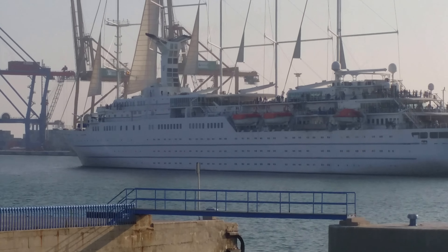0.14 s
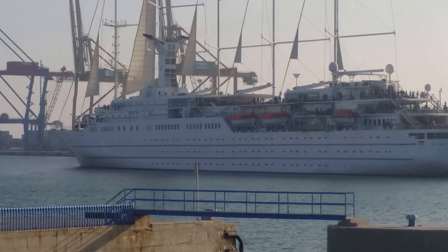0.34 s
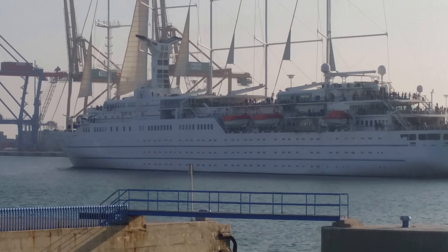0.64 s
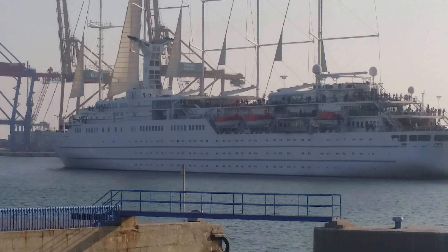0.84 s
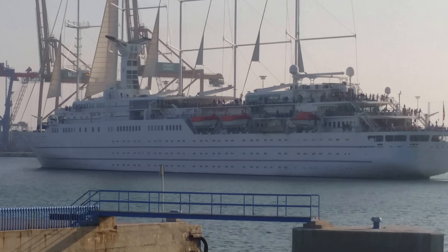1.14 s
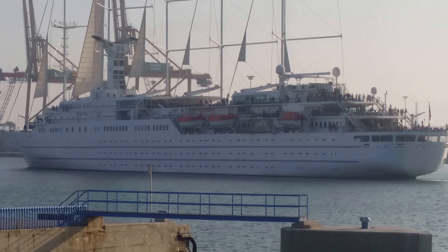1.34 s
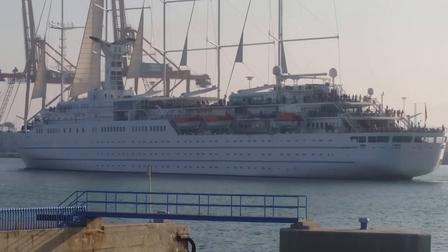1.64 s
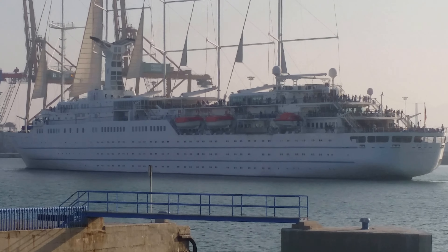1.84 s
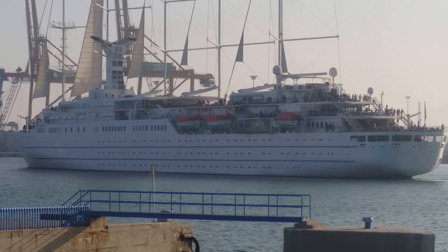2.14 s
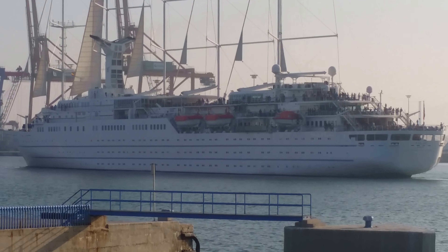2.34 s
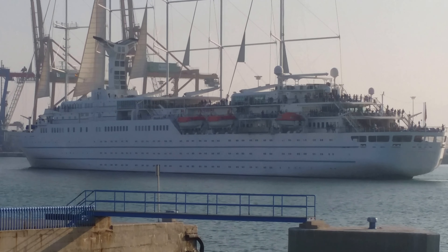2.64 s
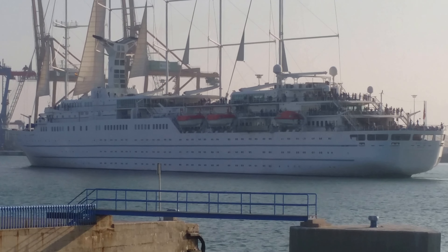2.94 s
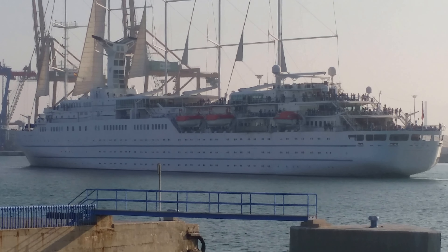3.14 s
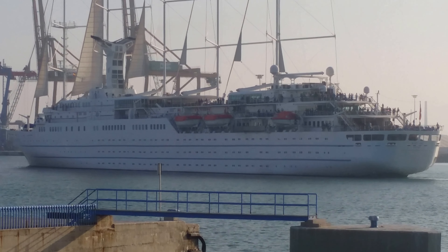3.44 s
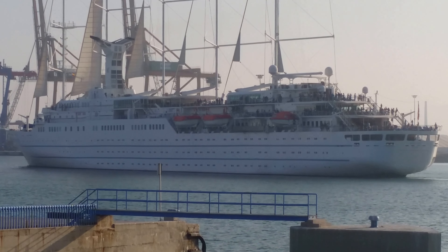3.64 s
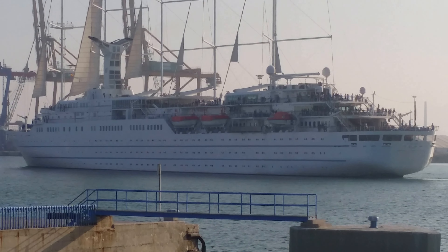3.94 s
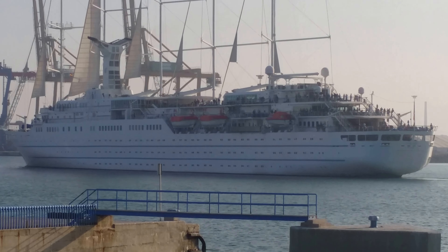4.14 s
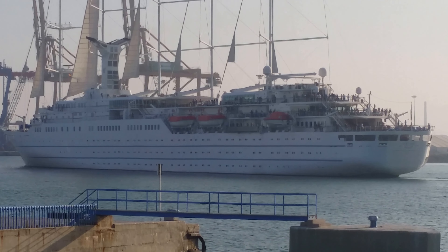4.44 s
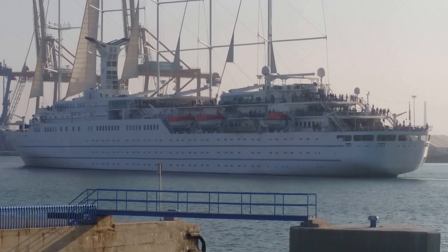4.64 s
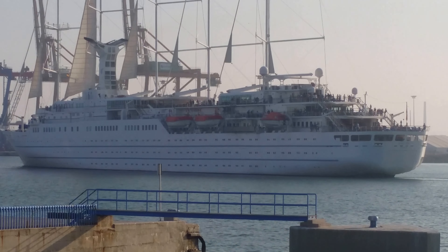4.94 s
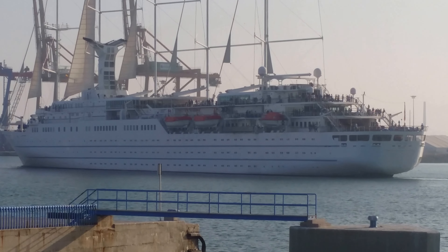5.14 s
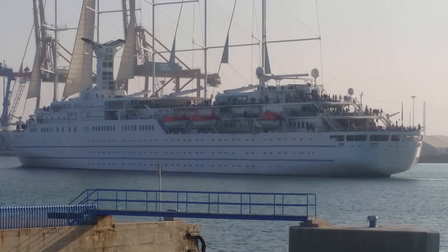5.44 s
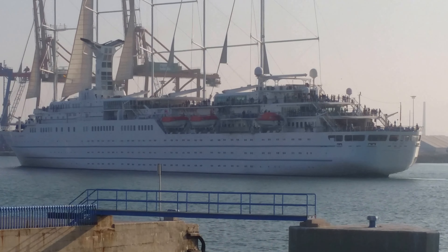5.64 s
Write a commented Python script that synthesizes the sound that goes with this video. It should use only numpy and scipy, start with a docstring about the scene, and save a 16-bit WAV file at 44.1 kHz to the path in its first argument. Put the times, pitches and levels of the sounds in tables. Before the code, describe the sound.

Heard from a quay, a departing ship gives off a deep pulsing rumble and a constant machinery hum over a light wash of water. Wind thumps on the microphone in the first second. About halfway, one sharp button click sounds right at the microphone, and fingers then slide softly on the camera's plastic case. A lens motor whines very faintly now and then while the engines carry on.

```python
"""A gust buffets the microphone over the low throb of a large ship moving slowly away from a quay.
Its diesels pulse under a rumble, its generators and fans hum, and a wash of water recedes with it.
Close by, hands work a camera: a thumb squeaks, halfway a button snaps back and rings the case, then
fingers slide on the plastic. The lens motor whines faintly about once a second."""
import sys
import numpy as np
from scipy import signal
from scipy.fft import rfft, irfft, next_fast_len
from scipy.io import wavfile

SR = 44100
rng = np.random.default_rng(int(sys.argv[2]) if len(sys.argv) > 2 else 0)


def digitize_waveform(pressure):
    """Quantize a signal to 16-bit integers and store it at the path in sys.argv[1].

    Rows of a 2-D input are taken as channels; values are limited to [-1, 1].
    """
    field = np.atleast_2d(pressure).T
    bounded = np.clip(field, -1, 1)
    quanta = np.round(bounded * 32767).astype(np.int16)
    wavfile.write(sys.argv[1], SR, quanta)


N = 255582
TIME, FREQS = np.arange(N) / SR, np.fft.rfftfreq(N, 1 / SR)

# where distant sound sits in the image; lean is left minus right: freq_hz, lean_db
FAR_LEAN = [(60, 0.5), (200, 2.5), (380, 3.5), (1290, 2), (2400, 6.5), (3200, -1.5), (4300, 11), (5500, -1),
            (8000, -0.5), (10000, 8.5), (13000, 1), (16000, 1.5)]


def gain_of(db):
    """Decibels to amplitude."""
    return 10 ** (np.asarray(db) / 20)


def unit_rms(x):
    """Scales to rms 1."""
    return x / np.sqrt(np.mean(x ** 2) + 1e-20)


def curve_at(points, hz=FREQS):
    """Interpolates a curve on a log-frequency axis."""
    f, value = np.transpose(points)
    return np.interp(np.log(hz + 1), np.log(f + 1), value)


def pan(lean_db):
    """Left and right gains of mean power 1."""
    pair = gain_of(np.array([[.5], [-.5]]) * lean_db)
    return pair / np.sqrt(np.mean(pair ** 2, axis=0))


def drift(rate_hz):
    """A smooth random wander of rms 1."""
    size = next_fast_len(N, real=True)
    smooth = np.exp(-np.minimum(np.fft.rfftfreq(size, 1 / SR) / rate_hz, 10) ** 2)
    return unit_rms(irfft(rfft(rng.standard_normal(size)) * smooth, size)[:N])


def swell(start_s, length_s, soft):
    """An envelope whose rounded fades each take the share `soft` of its length."""
    edge = np.minimum(TIME - start_s, start_s + length_s - TIME) / (soft * length_s)
    return np.sin(np.pi / 2 * np.clip(edge, 0, 1))


def ease_in(depth_db, settling_s):
    """A gain that starts low and eases up to 1."""
    return gain_of(-depth_db * np.exp(-TIME / settling_s))


def near_noise(spectrum):
    """Coloured noise, unrelated in the two microphone ports."""
    return unit_rms(irfft(rfft(rng.standard_normal((2, N))) * gain_of(curve_at(spectrum)), N))


def far_noise(spectrum):
    """Coloured noise from afar: narrow in the bass, wide in the treble."""
    # likeness of left and right: freq_hz, correlation
    likeness = [(60, 0.87), (130, 0.95), (290, 0.9), (640, 0.42), (1300, -0.25), (3100, 0.23),
                (15000, -0.63)]
    left, other = rfft(rng.standard_normal((2, N)))
    same = np.clip(curve_at(likeness), -1, 1)
    pair = np.array([left, same * left + np.sqrt(1 - same ** 2) * other])
    rolloff = 1 / (1 + (FREQS / spectrum[-1][0]) ** 8)
    return unit_rms(irfft(pair * gain_of(curve_at(spectrum)) * pan(curve_at(FAR_LEAN)) * rolloff, N))


def far_tone(hz, fading, fade_hz=1.5):
    """A steady tone plus its wavering reflection off water and hull."""
    paths = 1 + fading * (drift(fade_hz) + 1j * drift(fade_hz))
    carrier = np.exp(2j * np.pi * (hz * TIME + rng.random()))
    return unit_rms((paths * carrier).real) * pan(curve_at(FAR_LEAN, hz))


def harbour(wash_db=-51.5, fall_db_per_s=0.59, flicker_db=0.56, hiss_db=-65.5):
    """A bed of restless wash that slowly recedes, and an even hiss."""
    # wash of water and ventilation: freq_hz, relative_db
    wash_colour = [(400, -19.5), (800, -0.5), (1050, 0.5), (1350, -0.5), (1750, -4), (2100, -7),
                   (2550, -11.5), (3000, -21), (3500, -28.5), (5000, -39), (7500, -53.5)]
    # hiss coloured by the microphone ports: freq_hz, relative_db
    hiss_colour = [(2800, -29.5), (3500, -16), (3900, -3), (4300, 0.5), (4800, -4.5), (5200, -21),
                   (6500, -28), (8200, -35), (10000, -22.5), (12000, -15.5), (14500, -9), (15700, -4),
                   (16100, -39)]
    wash = far_noise(wash_colour) * gain_of(wash_db - fall_db_per_s * TIME + flicker_db * drift(35))
    hiss = far_noise(hiss_colour) * gain_of(hiss_db) * ease_in(depth_db=7.1, settling_s=0.84)
    return wash + hiss


def lens_motor(run_s=.24):
    """The focus motor whines in short runs, about once a second."""
    # motor runs: start_s, level_db
    runs = [(.08, -78.5), (1.15, -69), (2.15, -67), (3.2, -68), (4.27, -72), (5.24, -76)]
    # the motor's thin whine: freq_hz, relative_db
    whine_colour = [(8500, -41), (10000, -16.5), (10400, -8.5), (10900, -20), (11900, -9), (12400, 2.5),
                    (12900, -13.5), (15800, -13.5)]
    envelope = sum(gain_of(db) * swell(start, run_s, soft=0.38) for start, db in runs)
    return near_noise(whine_colour) * pan(lean_db=2) * envelope


def thumb(start_s=1.94, period_s=.128, stroke_s=.11, count=9, level_db=-74.5, uneven_db=5.0):
    """A thumb works to and fro on the case in high squeaks, each pressed a little differently."""
    # the thumb's squeak: freq_hz, relative_db
    squeak_colour = [(3000, -12.5), (5500, -13), (7800, -15), (9100, -2), (10000, 0), (11000, -7.5),
                     (16000, -18.5)]
    presses = gain_of(uneven_db * rng.uniform(-1, 1, count))
    force = sum(press * swell(start_s + k * period_s, stroke_s, soft=0.43)
                for k, press in enumerate(presses))
    return near_noise(squeak_colour) * force * gain_of(level_db) * pan(lean_db=14.5)


def button(attack_s=0.0023, release_db_per_s=998):
    """The button scrapes as it lets go and again as it slides back into its seat."""
    # the two scrapes: start_s, hold_s, level_db
    scrapes = [(2.9346, 0.0022, -24), (2.95, .052, -31)]
    # the button's friction: freq_hz, relative_db
    scrape_colour = [(15, -26), (60, -4), (130, 24.5), (260, 21.5), (450, 8.5), (650, 3.5), (1800, 0.5),
                     (2400, -19), (3200, -15.5), (3900, 3.5), (4700, -6.5), (5600, -32), (7800, -43),
                     (10000, -27), (11500, -29), (15000, -18)]
    force = np.zeros(N)
    for start, hold, db in scrapes:
        attack = np.clip((TIME - start) / attack_s, 0, 1)
        force += attack * gain_of(db - release_db_per_s * np.maximum(TIME - start - hold, 0))
    return near_noise(scrape_colour) * force * pan(lean_db=13)


def fingers(blur_hz=260):
    """Fingers slide and chafe on the plastic; uneven slips blur the pitch of each chafe."""
    # finger slides: start_s, length_s, squeak_db, lean_db, rub_over_squeak_db
    slides = [(3.298, 0.89, -70.5, 4.5, 9.5), (3.481, 0.19, -69.5, 0, 13.5), (3.582, 0.11, -65.5, 31, -7),
              (3.757, 0.089, -63, 12, -1), (4.703, 0.68, -77, 11, 2)]
    # a slide's lower rub: freq_hz, relative_db
    rub_colour = [(500, -11), (1100, -5.5), (1450, -6), (1850, -3), (2400, -5), (3200, -8.5), (4200, -11),
                  (5200, -24), (7500, -45)]
    # a slide's high squeak: freq_hz, relative_db
    squeak_colour = [(4000, -26.5), (7800, -19), (9200, -3.5), (10500, -0.5), (12500, -2), (14500, -10.5),
                     (16000, -8)]
    # skin chafing at a gliding pitch: start_s, length_s, level_db, first_hz, last_hz, lean_db
    chafes = [(0.209, 0.029, -48.5, 1494, 1500, 14), (3.526, 0.08, -48.5, 1240, 1524, 8),
              (3.585, 0.061, -53.5, 1610, 1860, 5), (3.946, 0.16, -59.5, 2250, 2140, 12)]
    out = np.zeros((2, N))
    rub, squeak = near_noise(rub_colour), near_noise(squeak_colour)
    for start, length, db, lean_db, rub_db in slides:
        friction = squeak + gain_of(rub_db) * rub
        out += gain_of(db) * pan(lean_db) * swell(start, length, soft=0.47) * friction
    slips = drift(blur_hz) + 1j * drift(blur_hz)
    for start, length, db, first_hz, last_hz, lean_db in chafes:
        cycles = np.cumsum(np.interp(TIME, [start, start + length], [first_hz, last_hz])) / SR
        chafe = (slips * np.exp(2j * np.pi * cycles)).real
        out += gain_of(db) * pan(lean_db) * swell(start, length, soft=0.44) * chafe
    return out


def handling(grain_db=2.5):
    """Button and skin stick and slip, which gives all their friction a fast grain."""
    return (button() + thumb() + fingers()) * unit_rms(gain_of(grain_db * drift(150)))


def case_knocks(trim_db=-2):
    """Each knock rings the camera case; a soft contact leaves out the high modes."""
    # modes of the case: pitch_hz, relative_db, t60_s, lean_db
    modes = [(122, -23.5, 0.064, 23.5), (259, -20, 0.066, 25.5), (448, -22, 0.03, 24),
             (940, -26, 0.0066, 11), (1510, -30.5, 0.0043, 11.5), (1853, -20.5, 0.0079, 22),
             (2530, -35.5, 0.0027, 13), (4070, -7, 0.0084, 27.5), (4430, -24, 0.0047, 25),
             (9900, -25, 0.0021, 11), (12700, -22, 0.0015, 7), (15000, -21, 0.0032, 13)]
    # knocks of button and fingers: start_s, relative_db, cutoff_hz
    knocks = [(0.229, -31.5, 2190), (2.733, -30.5, 6140), (2.735, -1.5, 610), (2.9359, -0.5, 18000),
              (2.9575, 5.5, 1840), (2.976, -5.5, 1990), (2.98, 3, 503), (3.831, -33, 4950),
              (4.045, -27.5, 3200), (4.076, -29, 3550)]
    t, out = np.arange(SR // 8) / SR, np.zeros((2, N))
    ring = sum(pan(lean_db) * gain_of(db - 60 * t / t60) * np.sin(2 * np.pi * hz * t)
               for hz, db, t60, lean_db in modes)
    for start, db, cutoff_hz in knocks:
        contact = signal.butter(4, cutoff_hz, fs=SR, output="sos")
        at = round(start * SR)
        out[:, at:at + len(t)] += gain_of(db + trim_db) * signal.sosfilt(contact, ring)
    return signal.lfilter(*signal.iirnotch(6400, 1.1, fs=SR), out)  # the ports swallow the mid treble


def wind(breeze_db=-47.5):
    """Turbulence at each port swells in gusts over a breeze; a few eddies suck at the diaphragm."""
    # low buffeting at the microphone: freq_hz, relative_db
    wind_colour = [(15, -26.5), (45, -3), (85, 10.5), (130, -6.5), (220, -8.5), (400, -32), (1200, -56),
                   (5000, -100)]
    # gusts: start_s, length_s, level_db, lean_db
    gusts = [(0.283, 0.48, -26, 14.5), (0.665, 0.24, -23.5, -9), (.88, .5, -37.5, 0)]
    # single eddies that thump a port: centre_s, peak_db, width_s, lean_db
    eddies = [(0.364, -14.5, 0.0028, 25), (.535, -16.5, 0.002, 25.5), (0.625, -14, 0.0037, 14),
              (0.734, -18.5, 0.0041, -3), (0.812, -17.5, 0.0033, -17.5), (1.0255, -9, 0.0021, 29)]
    force = gain_of(breeze_db) * pan(lean_db=10)
    for start, length, db, lean_db in gusts:
        force = force + gain_of(db) * pan(lean_db) * swell(start, length, soft=0.42)
    out = near_noise(wind_colour) * force
    for centre, db, width, lean_db in eddies:
        u = (TIME - centre) / width
        out += gain_of(db) * pan(lean_db) * (u ** 2 - 1) * np.exp(-u ** 2 / 2)
    return out


def machinery(hum_trim_db=0.72, drone_hz=158.2, rest_db=-47.5, swell_db=-37.5):
    """Generators and fans hum on board; one drone swells once and sinks back."""
    # generator and fan tones: pitch_hz, level_db, fading_ratio
    hum_tones = [(36, -46, .1), (78.3, -47, .3), (90, -39.6, .3), (165.2, -49, .2), (180, -36.3, .08),
                 (198.2, -52, .6), (235.5, -48.5, .9), (354.5, -49, .22), (436, -60, .9), (472.5, -62, .7),
                 (593.5, -62, .9)]
    hums = sum(gain_of(db + hum_trim_db) * far_tone(hz, fading) for hz, db, fading in hum_tones)
    drone_gain = gain_of(rest_db) + gain_of(swell_db) * swell(start_s=1.5, length_s=1.4, soft=0.53)
    drone = drone_gain * far_tone(drone_hz, fading=0.14)
    return hums * ease_in(depth_db=4.6, settling_s=1) + drone


def diesels(cycle_hz=4.266, rumble_db=-32.5, fall_db_per_s=0.2956, throb_db=0.5, flutter_db=1.18):
    """Exhaust tones under a rumble that throbs twice a working cycle and sinks as the ship leaves."""
    # strong exhaust orders: cycle_multiple, level_db
    orders = [(5, -58), (6, -45.5), (8, -53), (9, -49.5), (11, -41.5), (12, -41), (13, -45.5), (16, -48),
              (18, -44), (19, -48), (24, -49), (37, -50), (51, -51), (52, -55)]
    # the ship's rumble: freq_hz, relative_db
    rumble_colour = [(12, -39.5), (26, -13.5), (50, -6), (68, -4.5), (115, 1.5), (145, -3.5), (200, -6.5),
                     (280, -8.5), (370, -14.5), (480, -18), (620, -19), (750, -23.5), (1000, -25),
                     (1500, -51)]
    exhaust = sum(gain_of(db) * far_tone(k * cycle_hz, fading=0.087) for k, db in orders)
    throb = throb_db * np.sin(2 * np.pi * (2 * cycle_hz * TIME + rng.random()))
    rumble = far_noise(rumble_colour)
    rumble *= gain_of(rumble_db - fall_db_per_s * TIME + throb + flutter_db * drift(25))
    return (exhaust + rumble) * ease_in(depth_db=5, settling_s=0.14)


def scene():
    """The ship and harbour afar, wind and camera close by."""
    return diesels() + machinery() + harbour() + wind() + case_knocks() + handling() + lens_motor()


def record(dry):
    """A steep low-pass takes off the air above 15.9 kHz."""
    lowpass = signal.firwin(511, 15900, window=("kaiser", 9), fs=SR)
    return signal.oaconvolve(dry, lowpass[None], "same")


dry = scene()
out = record(dry)
digitize_waveform(out)
```